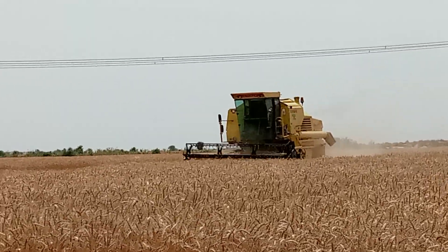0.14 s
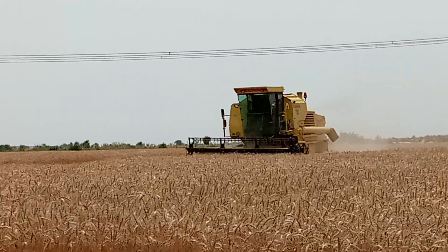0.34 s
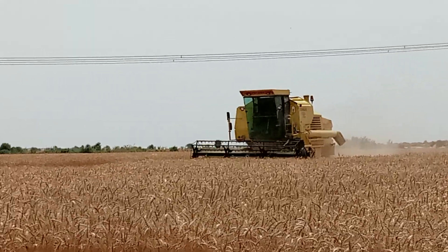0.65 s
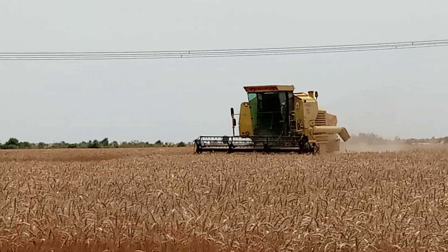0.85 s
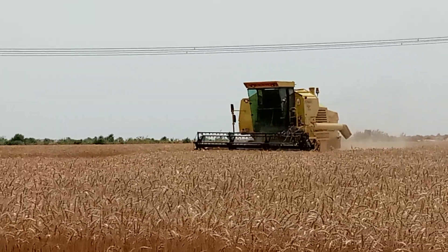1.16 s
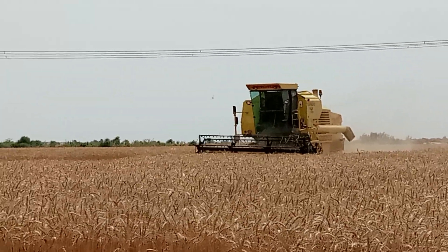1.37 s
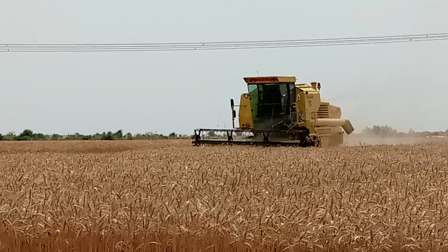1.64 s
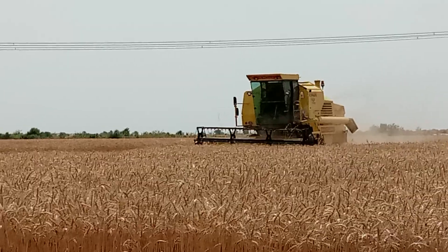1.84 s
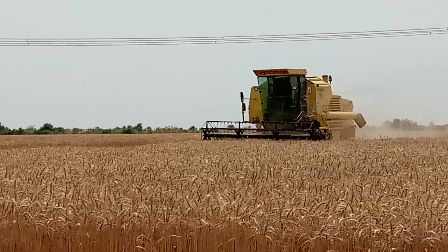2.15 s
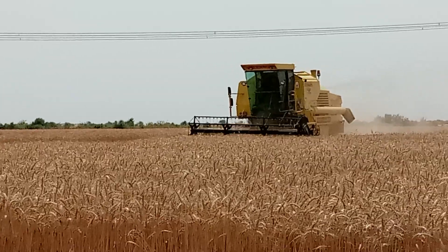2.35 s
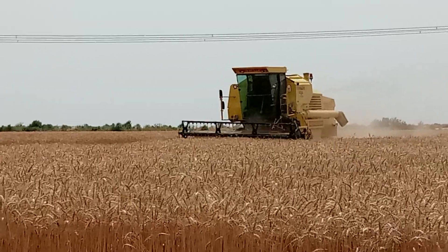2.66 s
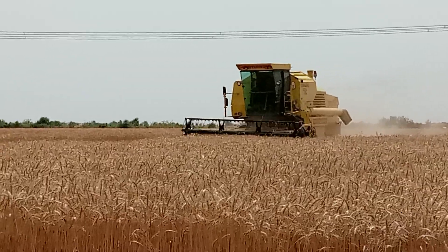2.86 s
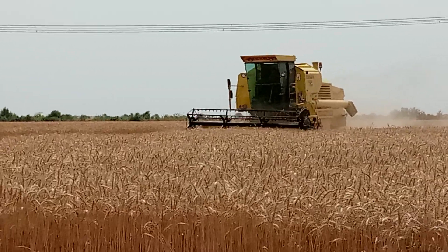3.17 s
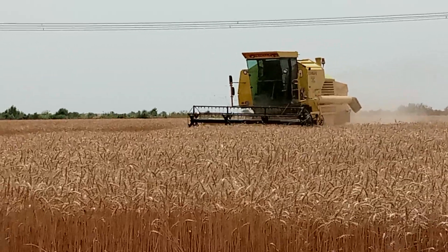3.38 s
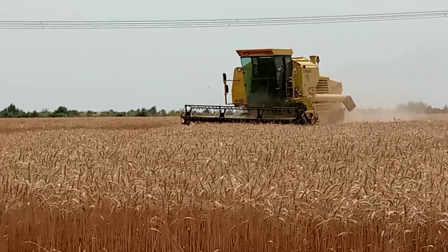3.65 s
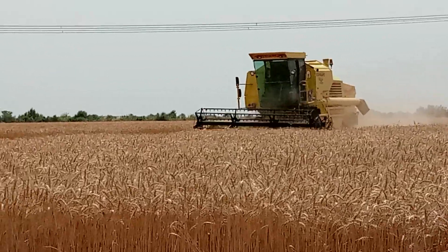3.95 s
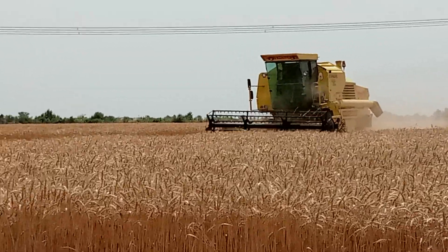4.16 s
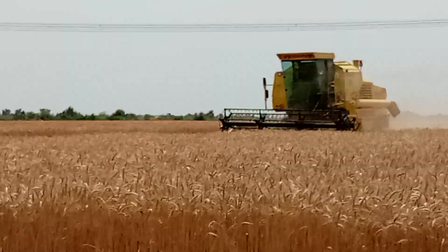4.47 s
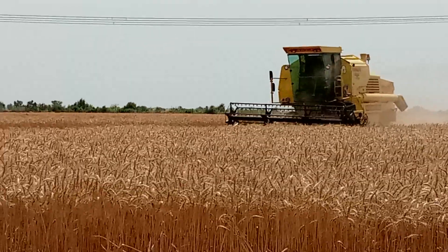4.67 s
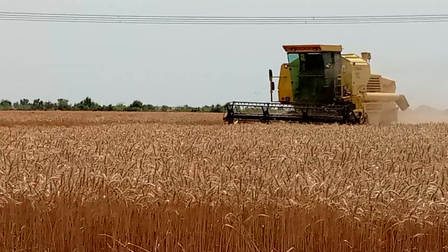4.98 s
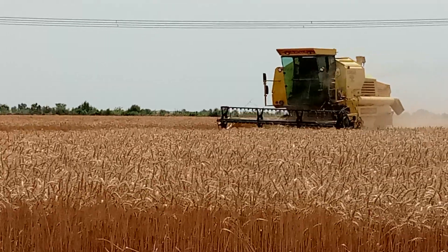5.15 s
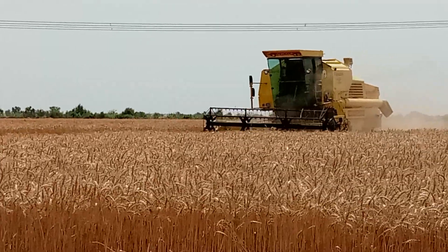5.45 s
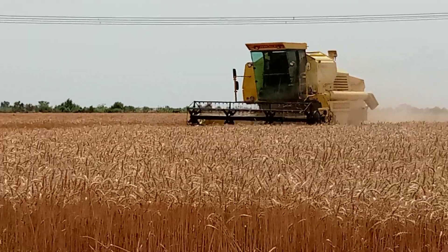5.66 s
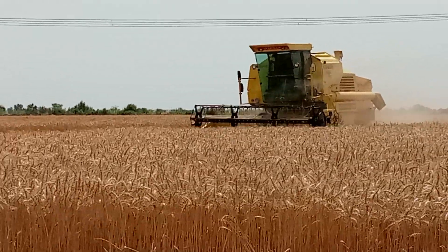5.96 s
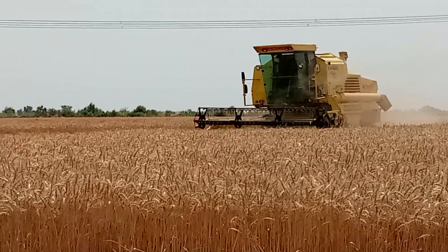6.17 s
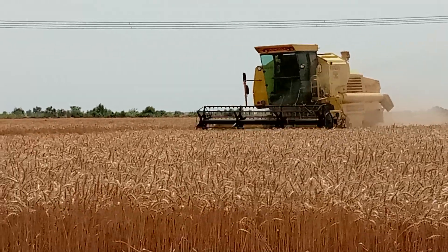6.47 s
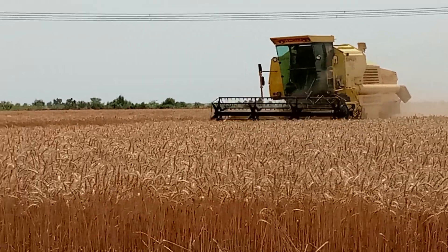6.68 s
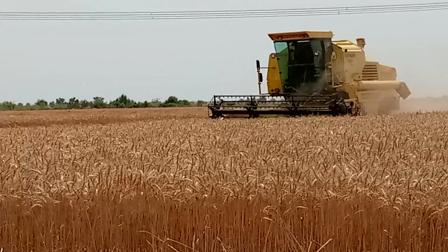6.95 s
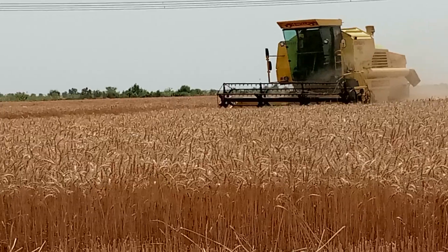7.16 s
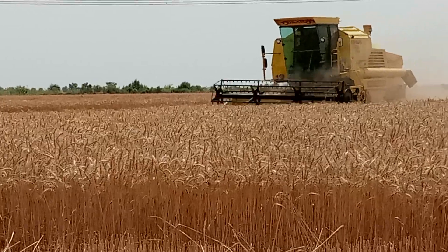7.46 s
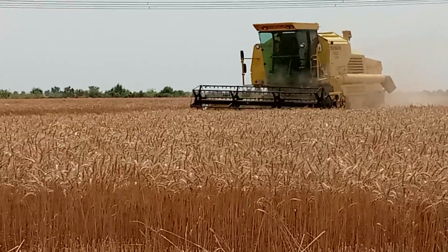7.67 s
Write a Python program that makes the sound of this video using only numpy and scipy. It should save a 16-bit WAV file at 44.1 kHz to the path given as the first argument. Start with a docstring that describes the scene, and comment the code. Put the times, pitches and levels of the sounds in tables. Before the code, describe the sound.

A combine harvester's low diesel drone surges and throbs over rumbling sieves and threshing roar, slowly nearing, with a few dry stalk snaps close by.

```python
"""A six-cylinder diesel drones, surging about twice a second and throbbing against a slower shaft.
It drives a combine harvester that comes slowly nearer across a wheat field, heard from the standing crop.
Beating noise makes the boom of the sieves and the roar of the thresher; steady tones make hums and a faint whine.
The cutter bar is noise that pulses with each stroke, and short damped rings are dry stalks snapping close by."""
import sys
import numpy as np
from scipy import signal
from scipy.fft import rfft, irfft
from scipy.io import wavfile
from scipy.ndimage import uniform_filter1d

SR = 44100
rng = np.random.default_rng(int(sys.argv[2]) if len(sys.argv) > 2 else 0)


def store_pcm(level_fs):
    """Save levels as 16-bit WAV."""
    pcm = np.round(np.clip(level_fs, -1, 1) * 32767).astype(np.int16)
    wavfile.write(sys.argv[1], SR, np.atleast_2d(pcm).T)


N = 344862
TIME = np.arange(N) / SR  # s
BEAT_HZ = 12.23  # how far the slower shaft turns below the firing rate; also shakes the panels
STROKE_HZ = 19.8  # strokes of the knife

# firing rate of the diesel: time_s, rate_hz
FIRING_RATE = [(0, 120.1), (1, 120.3), (1.5, 120.5), (2, 120), (6.5, 120.05), (7, 120.9), (7.5, 120.2),
               (7.82, 120)]
# approach of the machine: time_s, share of the nearer colour (0 to 1)
NEARNESS_SHARE = [(0, 0.1), (5.2, 0), (6.6, 0.13), (6.85, 0.63), (7.0, 0.91), (7.82, 1)]


def from_db(db):
    """Decibels to gain."""
    return 10 ** (np.asarray(db) / 20)


def unit(x):
    """Scales to rms 1."""
    return x / np.sqrt(np.mean(x ** 2) + 1e-20)


def curve(rows):
    """Joins (time_s, value) rows by straight lines."""
    return np.interp(TIME, *np.transpose(rows))


def wander(rate_hz):
    """Random drift of rms 1: noise whose spectrum falls away around rate_hz."""
    hz = np.fft.rfftfreq(N, 1 / SR)
    spectrum = rfft(rng.standard_normal(N))
    return unit(irfft(spectrum * np.exp(-(hz / rate_hz) ** 2), N))


def coloured(x, colour):
    """Filters x through (pitch_hz, level_db) points, joined on a log pitch scale, to rms 1."""
    hz, db = np.transpose(colour)
    bins = np.fft.rfftfreq(N, 1 / SR)
    gain = from_db(np.interp(np.log(bins + 1), np.log(hz), db))
    return unit(irfft(rfft(x) * gain, N))


def beating(rate_hz, depth):
    """Level swing of a part that strikes at a nearly steady rate."""
    strikes = np.cumsum(rate_hz * (1 + 0.004 * wander(0.93))) / SR
    return unit(1 + depth * np.cos(2 * np.pi * strikes))


def approaching(x, far_colour, near_colour):
    """The colour of a source changes as it comes nearer."""
    near = np.clip(curve(NEARNESS_SHARE), 0, 1)
    return (1 - near) * coloured(x, far_colour) + near * coloured(x, near_colour)


def through_air(x):
    """Warm, moving air over the crop makes narrow bands swell and fade on their own."""
    bands = signal.stft(x, nperseg=1024, noverlap=768)[2]
    patches = rng.standard_normal(bands.shape)
    patches = uniform_filter1d(patches, size=5, axis=0)  # across pitch
    patches = uniform_filter1d(patches, size=14, axis=1)  # across time
    swell = from_db(1.6 * unit(patches))
    return signal.istft(bands * swell, nperseg=1024, noverlap=768)[1][:N]


def rumble(trim_db=-0.31, shaking=0.16, lumps_db=1.48, lumps_hz=7):
    """Panels and sieves boom in uneven lumps, shaken by the drum; the deepest part grows steadily."""
    # boom of panels and sieves before the trim: time_s, level_db
    boom_level = [(0, -48.5), (1.6, -45), (2.6, -45.5), (3.7, -46.5), (4.7, -43.5), (5.4, -44), (6.4, -42),
                  (7.15, -39), (7.82, -41.5)]
    # colour of the boom: pitch_hz, level_db
    boom_colour = [(20, -27.5), (38, -23.5), (60, -11), (100, -3), (140, 0.5), (185, -0.5), (210, -6),
                   (300, -4), (420, -13), (500, -18.5), (600, -27.5), (900, -67.5)]
    deep_hz, deep_start_db, deep_db_per_s = 138, -44, 0.4  # upper edge, level at the start, growth
    shake = rng.standard_normal(N) * beating(BEAT_HZ, depth=shaking)
    boom = coloured(shake, boom_colour)
    deep = signal.sosfiltfilt(signal.butter(2, deep_hz, fs=SR, output="sos"), boom)
    panels_db = curve(boom_level) + trim_db + lumps_db * wander(lumps_hz)
    panels = from_db(panels_db) * through_air(boom - deep)
    return panels + from_db(deep_start_db + deep_db_per_s * TIME) * deep


def hum(hz, slip, fading):
    """A rotating part: its belt slips a little and the moving air fades it in and out."""
    turns = np.cumsum(hz * (1 + slip * wander(3.97))) / SR
    return unit(np.cos(2 * np.pi * turns) * (1 + fading * wander(5.7)))


def drives(shafts_start_db=-2.5, shafts_db_per_s=0.5445):
    """Shaft hums that grow as the machine nears, two notes of the fan and the thin whine of a gear."""
    # hums of drum, fan and pulleys, before their common growth: pitch_hz, level_db
    shaft_hums = [(54, -58.5), (61, -56), (69, -61.5), (89, -58.5), (176, -52.5), (189, -57), (232, -55),
                  (244, -56.5), (440, -68.5), (713, -71), (772, -69), (881, -69), (962, -72)]
    # cleaning fan, its lower note: time_s, level_db
    fan_level = [(0, -78), (5.6, -72), (6.05, -60), (6.6, -63), (6.9, -73), (7.25, -58), (7.5, -68)]
    # gear whine: time_s, level_db
    whine_level = [(0, -71), (.8, -71), (1.7, -77.5), (2.8, -66), (4, -78), (6.8, -70.5), (7.82, -71.5)]
    shafts = sum(from_db(db) * hum(hz, slip=0.006, fading=0.7) for hz, db in shaft_hums)
    fan_notes = hum(546, slip=0.013, fading=1.3) + 0.56 * hum(963, slip=0.005, fading=0.27)
    fan = from_db(curve(fan_level)) * fan_notes
    whine = from_db(curve(whine_level)) * hum(1502, slip=0.003, fading=0.16)
    return from_db(shafts_start_db + shafts_db_per_s * TIME) * shafts + fan + whine


def clatter(slip=0.00293):
    """The same run of knocks comes round with every engine cycle: a dense, wavering comb of tones."""
    cycle_hz = curve(FIRING_RATE) / 6  # six firings a cycle
    cycles = np.cumsum(cycle_hz * (1 + slip * wander(4))) / SR
    knocks = rng.standard_normal(512)
    repeated = np.interp(cycles % 1, np.linspace(0, 1, len(knocks)), knocks)
    return unit(repeated * (1 + 0.5 * wander(4)))


def thresher(feed_db=1.17, clatter_db=-5):
    """The bars of the drum beat an uneven flow of crop, over the clatter of the engine."""
    # threshing roar before the uneven feed: time_s, level_db
    roar_level = [(0, -55.5), (1.4, -57), (2.75, -54), (3.55, -57.5), (4.5, -55), (6.2, -55), (7, -52.5),
                  (7.82, -53.5)]
    # colour of the roar from afar: pitch_hz, level_db
    roar_far = [(400, -12.5), (610, -14), (670, -4), (730, 3), (900, -2), (1150, -4.5), (1430, -9.5),
                (1550, -13), (1680, -18), (2100, -16.5), (4000, -52)]
    # colour of the roar from nearer: pitch_hz, level_db
    roar_near = [(400, -28), (640, -8), (740, -4.5), (900, -1), (1150, -3.5), (1380, -10.5), (1500, -12),
                 (1680, -18), (2100, -32.5), (4000, -63)]
    crop = rng.standard_normal(N) * beating(140, depth=0.086)
    crop = crop * beating(39.8, depth=0.036) * beating(STROKE_HZ, depth=0.075)
    roar = approaching(crop, roar_far, roar_near)
    roar += from_db(clatter_db) * approaching(clatter(), roar_far, roar_near)
    return from_db(curve(roar_level) + feed_db * wander(42)) * unit(roar)


def debris(stroke, chaff_db=-72.5, straw_db=-72, sizzle_db=-97, sizzle_db_per_s=2.0):
    """Chaff, straw and a thin sizzle: noise bands that swell together and pulse with the knife."""
    # common swell of the treble, followed in full by the straw: time_s, level_db
    treble_swell = [(0, -8.5), (1, 1.5), (2, 2), (2.5, -9), (4.2, -3.5), (4.5, -1), (5.1, -4), (5.6, 0.5),
                    (6.4, -2.5), (6.98, 13.5), (7.25, -1), (7.82, 1)]
    # colour of the chaff: pitch_hz, level_db
    chaff_colour = [(2000, 4), (4100, -2.5), (4900, 2), (5400, 0), (6000, 2.5), (6800, -1.5), (7350, -9.5),
                    (8000, -15.5), (10000, -32), (12000, -41), (15500, -25)]
    # colour of the straw: pitch_hz, level_db
    straw_colour = [(2700, -25.5), (3250, 4), (3700, -1), (3950, -17), (4400, -48)]
    # colour of the sizzle: pitch_hz, level_db
    sizzle_colour = [(3600, -33), (4150, 6.5), (4650, -2.5), (6000, -37.5)]
    far_pulse, near_pulse = 0.19, 0.21  # depth of the pulsing
    swell_db = curve(treble_swell)
    pulse = far_pulse + (near_pulse - far_pulse) * curve(NEARNESS_SHARE)
    dust = rng.standard_normal((3, N)) * (1 + pulse * stroke)
    chaff = from_db(chaff_db + 0.29 * swell_db) * coloured(dust[0], chaff_colour)
    straw = from_db(straw_db + swell_db) * coloured(dust[1], straw_colour)
    sizzle_level = from_db(sizzle_db + sizzle_db_per_s * TIME + 0.7 * swell_db)
    return chaff + straw + sizzle_level * coloured(dust[2], sizzle_colour)


def cutter(near_db=3, pulse=0.1, clump_db=1.35, grain_db=1.0):
    """Each knife stroke cuts a swarm of stems: a pulsing hiss with finer straw and chaff above it."""
    # hiss before the gain of nearness: time_s, level_db
    hiss_level = [(0, -68), (.9, -63.5), (2.5, -62), (4, -61.5), (5.7, -57.5), (6.6, -56.5), (6.9, -57.5),
                  (7.2, -54), (7.5, -58), (7.82, -56.5)]
    # colour of the hiss from afar: pitch_hz, level_db
    hiss_far = [(1200, -27), (1700, -9.5), (1980, 2.5), (2150, -16), (2330, -18), (2480, -1.5), (2620, 6),
                (2900, 2.5), (3250, -3.5), (3550, -8.5), (3780, -17), (3980, -26.5), (6000, -56.5)]
    # colour of the hiss from nearer: pitch_hz, level_db
    hiss_near = [(1200, -31), (1700, -16.5), (1850, -3), (2070, 1.5), (2220, 0.5), (2380, -3), (2680, -3),
                 (2930, -3), (3200, -13.5), (3700, -13), (4050, -28.5), (6000, -59)]
    stroke = np.cos(2 * np.pi * np.cumsum(STROKE_HZ * (1 + 0.0062 * wander(1))) / SR)
    stems = rng.standard_normal(N) * from_db(grain_db * wander(900) + clump_db * wander(37))
    hiss = approaching(stems * (1 + pulse * stroke), hiss_far, hiss_near)
    hiss_db = curve(hiss_level) + near_db * curve(NEARNESS_SHARE)
    return hiss * from_db(hiss_db) + debris(stroke)


def ring(hz, t60):
    """A short damped ring with a soft start; its envelope peaks at 1 and falls 60 dB in t60 seconds."""
    t = np.arange(round(0.02 * SR)) / SR
    shape = (1 - np.exp(-t / 0.00025)) * from_db(-60 * t / t60)
    return shape / shape.max() * np.sin(2 * np.pi * hz * t)


def ticks(start_s=4.8, per_s=3, level_db=-71, spread_db=2.5, ring_hz=9300):
    """Faint ticks of dry ears near the microphone: tiny rings at random moments after start_s."""
    moments = (rng.random(N) < per_s / SR) * (TIME > start_s)
    strikes = moments * from_db(level_db + spread_db * rng.standard_normal(N))
    return signal.oaconvolve(strikes, ring(ring_hz, t60=0.002))[:N]


def stalks(splinter_hz=9700, crunch_db=-11):
    """Dry stems break close by: a damped ring, a splinter and a short crunch of fibres."""
    # snaps: start_s, ring level_db, pitch_hz of the break, splinter_db against the ring, crunch_t60_s
    snap_rows = [(1.2353, -40.5, 6100, -3, 0.0077), (1.2435, -50, 6000, -6, 0.0087),
                 (1.253, -59, 6200, -2, .005), (1.2595, -43.5, 3060, -19, 0.012),
                 (1.2605, -39, 2220, -30, 0.0077), (1.276, -50, 2500, -22, 0.034),
                 (3.6807, -58, 5900, -7, .007), (3.7067, -53.5, 5670, -12, .009),
                 (3.716, -60, 5600, -4, .009), (5.6626, -49, 7250, -13, 0.036),
                 (6.0686, -52.5, 5800, -25, .008), (6.317, -65, 7360, -6, .006),
                 (7.243, -58.5, 6760, -1, .01)]
    # colour of tearing straw: pitch_hz, level_db
    crunch_colour = [(1000, -10), (2500, -7.5), (4500, 5), (6200, 8), (8000, -23.5), (10000, -8.5),
                     (12000, -20), (15500, -22)]
    rings, tearing = np.zeros(N), np.zeros(N)
    for start_s, db, hz, splinter_db, crunch_t60 in snap_rows:
        splinter = ring(splinter_hz * rng.uniform(0.95, 1.03), t60=0.0045)
        snap = ring(hz, t60=0.005) + from_db(splinter_db) * splinter
        part = rings[round(start_s * SR):][:len(snap)]  # a view: adding to it fills rings
        part += from_db(db) * snap[:len(part)]
        decay_db = -60 * np.clip((TIME - start_s) / crunch_t60, 0, 2)
        tearing += (TIME >= start_s) * from_db(db + decay_db)
    crunch = uniform_filter1d(tearing, size=15) * coloured(rng.standard_normal(N), crunch_colour)
    return rings + from_db(crunch_db) * crunch


def surging(base_db=-42.5, squareness=3.4):
    """Gain of the drone before its trim: rounded swells, flatter-topped than a bell, on a steady base."""
    # swells added to the base: middle_s, length_s, level_db
    surge_rows = [(0.1, 0.2, -38.5), (0.532, .36, -38.5), (1.05, .24, -38.5), (1.472, .22, -41),
                  (1.859, .24, -37), (2.46, .45, -37.5), (3.025, .29, -36.5), (3.364, .27, -36),
                  (3.802, 0.65, -42.5), (4.445, .25, -33.5), (4.929, 0.67, -38), (5.594, 0.49, -38),
                  (5.942, .24, -40), (6.41, .45, -38.5), (6.95, 0.56, -40.5), (7.312, 0.13, -34.5),
                  (7.7, 0.49, -43.5)]
    gain = from_db(base_db)
    for middle_s, length_s, db in surge_rows:
        gain = gain + from_db(db) * np.exp(-abs(2 * (TIME - middle_s) / length_s) ** squareness)
    return gain


def exhaust(drone_db=-1.8, upper=0.2, lope=0.24, throb_fading=0.57):
    """Six firings a cycle make the drone; unequal cylinders add lower orders; a slower shaft beats on it."""
    # tones of the exhaust: multiple of the engine cycle, level_db against the drone's gain
    cycle_orders = [(1, -28), (2, -43.5), (3, -27), (4, -16.5), (6, 1.5), (12, -22)]
    # hum of the slower shaft before its fading: time_s, level_db
    throb_level = [(0, -58.5), (1, -61), (1.42, -44), (1.9, -61), (3.85, -46.5), (4.2, -57), (6.3, -48),
                   (7.2, -64), (7.82, -53)]
    flutter, flutter_per_s, flutter_hz = 0.1, 0.016, 17  # depth at the start, growth, quickness
    turns = np.cumsum(curve(FIRING_RATE)) / SR
    level = from_db(drone_db) * surging()
    out = np.zeros(N)
    for order, db in cycle_orders:
        multiple = round(order) / 6  # of the firing rate
        # only the firing tone surges; the others lope around its mean level
        strength = level if multiple == 1 else level.mean() * (1 + lope * wander(3))
        out += from_db(db) * strength * np.cos(2 * np.pi * multiple * turns)
    beat = BEAT_HZ * TIME
    sides = np.cos(2 * np.pi * (turns - beat)) + upper * np.cos(2 * np.pi * (turns + beat))
    out += from_db(curve(throb_level)) * (1 + throb_fading * wander(3.6)) * sides
    unevenness = unit(np.gradient(wander(flutter_hz)))  # the slope holds little slow drift
    return np.sqrt(2) * out * (1 + (flutter + flutter_per_s * TIME) * unevenness)


def scene():
    """The whole machine in the open field, with no walls to echo."""
    crop = through_air(thresher() + cutter())
    machine = rumble() + drives() + crop + exhaust()
    return (machine + ticks() + stalks())[None]


def record(dry, edge_hz=15700):
    """The microphone's dull top, then the recorder's band limit."""
    # treble of the microphone: pitch_hz, level_db
    microphone_treble = [(10500, -0.5), (11800, -4.5), (13200, -7), (15000, -3.5)]
    bins = np.fft.rfftfreq(N, 1 / SR)
    treble = from_db(np.interp(bins, *np.transpose(microphone_treble)))
    faded = dry * signal.windows.tukey(N, 0.001)  # very short fades at both ends
    heard = irfft(rfft(faded) * treble, N)
    band_limit = signal.firwin(511, edge_hz, window=("kaiser", 9), fs=SR)
    return signal.oaconvolve(heard, band_limit[None], "same")


dry = scene()
out = record(dry)
store_pcm(out)
```